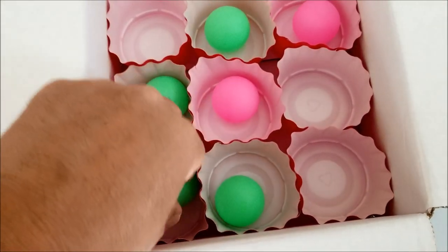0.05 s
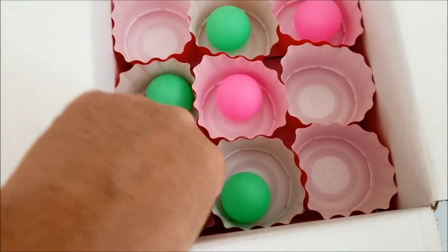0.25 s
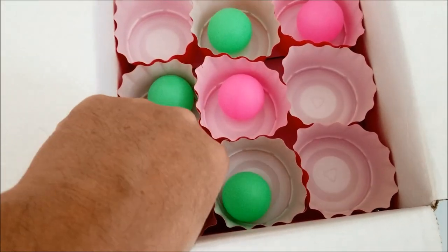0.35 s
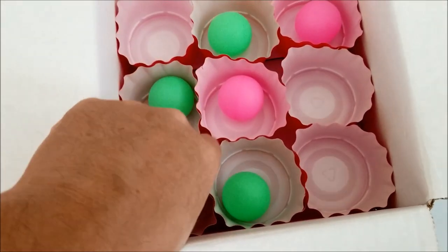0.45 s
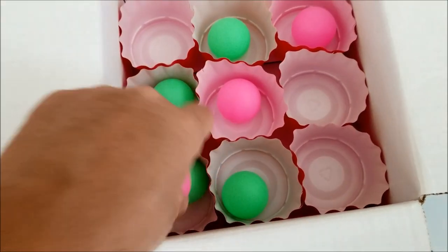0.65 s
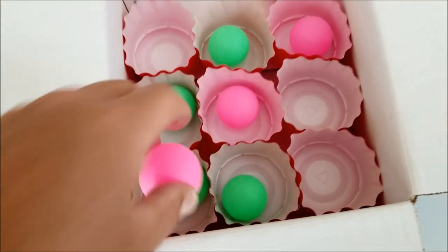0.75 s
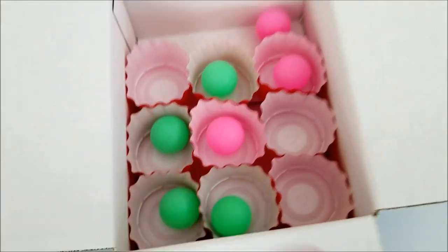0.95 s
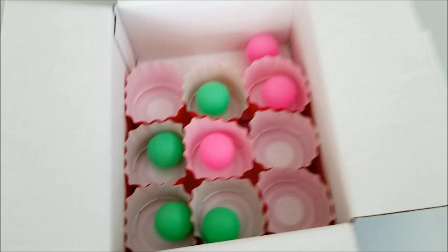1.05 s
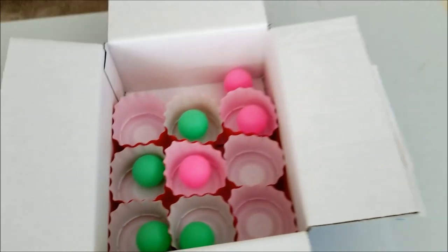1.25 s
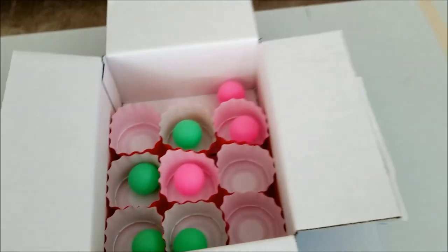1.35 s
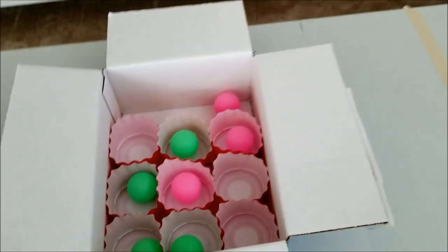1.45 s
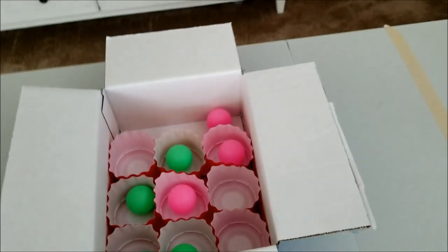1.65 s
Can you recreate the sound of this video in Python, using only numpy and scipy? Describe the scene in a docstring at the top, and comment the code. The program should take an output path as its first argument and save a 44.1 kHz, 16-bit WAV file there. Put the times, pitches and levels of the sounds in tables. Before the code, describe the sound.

One sharp knock of a plastic ball dropped among paper cups, with two tiny bounces.

```python
"""A few soft touches and a tick, then one sharp knock that rings round a bare room, and two small bounces:
a light plastic ball is handled among paper cups in a cardboard box. Each hit is a hard plastic crack,
the ringing modes of ball and box, and a swarm of echoes off cups, box and walls. Fingers rustle the
paper and the box thuds in the hand. Something soft swishes twice near the end; a low rumble and a thin
hiss lie beneath."""
import sys
import numpy as np
from scipy import signal
from scipy.fft import rfft, irfft, next_fast_len
from scipy.io import wavfile

SR = 44100
rng = np.random.default_rng(int(sys.argv[2]) if len(sys.argv) > 2 else 0)


def generate_wav(sig):
    """Save sig (samples, or channels by samples) to the path in sys.argv[1] as 16-bit PCM at SR."""
    pcm = np.round(np.clip(np.atleast_2d(sig).T, -1, 1) * 32767).astype(np.int16)
    wavfile.write(sys.argv[1], SR, pcm)


N = 74970

# Fader of the hiss: time_s, level_db
HISS_FADER = [(0, -72), (.03, -80), (.09, -65), (.16, -74), (.6, -78.5), (.7, -82.5), (1.15, -80.5),
              (1.24, -77.5), (1.4, -76.5), (1.7, -77.5)]
# Tone of the hiss: pitch_hz, gain_db
HISS_COLOUR = [(400, -28), (600, -19), (1000, -15.5), (2500, -17), (6600, -20), (10000, -11.5), (13800, -2),
               (16000, -3.5)]
# Fader of the rumble: time_s, level_db
RUMBLE_FADER = [(0, -55), (.036, -64), (.098, -58), (.208, -62), (.254, -55), (.344, -62), (.45, -63),
                (.55, -67), (.9, -69), (1.3, -68), (1.7, -66.5)]
# Tone of the rumble: pitch_hz, gain_db
RUMBLE_COLOUR = [(20, -11), (45, -16), (80, -2.5), (125, -9), (165, -5.5), (200, -13), (290, -14),
                 (330, -24.5), (420, -36.5)]
# Resonant humps in the rumble: pitch_hz, width_hz, gain_db
RUMBLE_HUMPS = [(78, 14, 3), (158, 18, 3), (287, 18, -9)]
# Stereo image of hiss and rumble: pitch_hz, left_right_correlation
BED_IMAGE = [(60, 1), (180, 1), (550, 1), (1650, -0.56), (4970, -0.06), (15000, -0.19)]
# Deep bumps of the handled box: time_s, gain_db
BUMP_FADER = [(0.0, -69), (0.066, -53.5), (0.082, -53), (0.106, -58), (0.12, -56), (0.14, -68.5),
              (0.176, -56.5), (0.214, -74.5), (0.244, -51), (0.274, -63), (0.296, -59.5), (0.392, -75.5),
              (0.444, -67), (0.5, -82.5)]
# The two swishes: time_s, gain_db, left_over_right_db, tilt_db_per_octave
SWISH_MOVES = [(1.22, -100, 0.5, -0.18), (1.3, -81.5, 0, 0.3), (1.36, -70, .6, -1), (1.41, -69, 1.3, -0.7),
               (1.45, -70.5, 3.5, -1), (1.49, -77.5, 2, -0.5), (1.53, -75.5, 0, 0), (1.575, -71, 0, 0.5),
               (1.61, -72, 2.5, 0.6), (1.66, -80.5, -0.5, 0.4), (1.7, -92.5, 2.5, 1.1)]
# Tone of the swishes: pitch_hz, gain_db
SWISH_COLOUR = [(240, -39), (400, -9), (429, -13.5), (623, -6.5), (811, -7.5), (1160, -7), (1840, -0.5),
                (5130, -14), (11000, -21), (14300, -47.5), (22000, -120)]
# Paper under the hand: time_s, gain_db, tilt_db_per_octave
RUSTLE_MOVES = [(.05, -78, 0.9), (.075, -71, -0.8), (.096, -48.5, -0.6), (.115, -55.5, -4), (.156, -57, -2),
                (.19, -58.5, 1.3), (.23, -59.5, .1), (.38, -62, -1.17), (.41, -55, 0.56), (.44, -61, 0.5),
                (.486, -57, 0), (.51, -61, -1.07), (.58, -64, .5), (.62, -74.5, 0), (.67, -90.5, 2.24)]
# Tone of the paper: pitch_hz, gain_db
PAPER_COLOUR = [(300, -6.5), (520, 0), (850, -5.5), (1300, -13.5), (2200, -9.5), (3500, -18.5), (8000, -22),
                (13000, -24), (16000, -27.5)]
# Stereo image of swishes, paper and echoes: pitch_hz, left_right_correlation
ACTION_IMAGE = [(60, 0.94), (240, 0.72), (950, 0.71), (3770, -0.19), (15000, 0.21)]
# Tone of a knock as the room returns it: pitch_hz, gain_db
ECHO_COLOUR = [(200, -29.5), (300, -8.5), (1000, -5.5), (2100, -1), (5200, -3), (9000, -4), (13500, -7.5),
               (16000, -14)]
# First fast decay of the echoes: pitch_hz, t60_s
EARLY_DECAY = [(250, 0.27), (700, .2), (2000, 0.073), (6000, 0.091), (14000, 0.061)]
# Room tail: pitch_hz, t60_s
TAIL_DECAY = [(250, 0.29), (700, 0.53), (2000, .4), (6000, .32), (14000, 0.2)]
# Slaps of the crack off the nearest walls: delay_s, gain_db
WALL_SLAPS = [(.0018, -3.5), (.0042, -7), (.012, -6.5), (.031, -16.5)]
# Modes of ball and box: pitch_hz, gain_db, t60_s
BODY_MODES = [(315, -3, .1), (428, -3, .1), (512, -1.5, .16), (604, -7, .1), (790, -5, .1),
              (829, -1.5, .16), (905, -7, .2), (1099, -1.5, .08), (1340, -2.5, .09), (1600, -5, .07),
              (1745, -5, .07), (1995, -5, .08), (2448, -1.5, .05), (2925, -8, .07), (3352, -7, .16),
              (5620, -5, .05)]
# Hits of the ball, each with a send to ring and echoes: start_s, gain_db, tilt_db_per_octave, send_db
KNOCKS = [(0.0749, -60, 10.5, -7.7), (0.0888, -48, 1.25, -8.3), (.136, -51, -6.5, -0.5),
          (.199, -33, 2.5, -12.5), (0.2345, -12.5, 0.05, 2.44), (.400, -48, -4, 3.6), (0.479, -54, -1, 4.5),
          (.595, -61.5, 0, 1.1)]

HISS_PAN_DB, LOW_PAN_DB, PAPER_PAN_DB, KNOCK_PAN_DB = 2.5, 3.5, 2.5, 2
WHINE_HZ, WHINE_DB = 14200, -101
ECHO_DB, TAIL_DB, ECHOES_PER_S, ECHO_SPREAD_DB = -6, -14, 8200, 3.5
BUILD_S, BUILD_CYCLES = 0.00058, 3.0   # attack of the echo swarm, lows later
BODY_DB, SWELL_CYCLES, EAR_PHASE_RAD = -17.5, 3.0, 0.55
CRACK_DECAY_S, CRACK_DB, CRACK_LOW_CUT_HZ, KNOCK_LOW_CUT_HZ = 0.00052, 7, 1190, 260
SHELL_BAND_HZ, SHELL_DB = (1300, 3325), 1   # the ball's shell lifts this band of the crack
TOP_STOP_HZ = 16800


def amp(db):
    return 10 ** (np.asarray(db) / 20)


def unit_rms(x):
    return x / np.sqrt(np.mean(x ** 2) + 1e-20)


def butter(x, order, hz, kind):
    return signal.sosfilt(signal.butter(order, hz, kind, fs=SR, output="sos"), x)


def automation(rows):
    """One curve per column, gliding between the timed rows."""
    times_s, *columns = np.transpose(rows)
    return [np.interp(np.arange(N) / SR, times_s, column) for column in columns]


def at_hz(points, hz):
    """Read a curve along a log pitch axis."""
    pitches_hz, values = np.transpose(points)
    return np.interp(np.log(hz), np.log(pitches_hz), values)


def drift(rate_hz):
    """Slow random wobble of rms 1."""
    hop, settle = 40, 2000
    pole = np.exp(-2 * np.pi * rate_hz * hop / SR)
    white = rng.standard_normal(N // hop + settle + 2)
    slow = signal.lfilter([1], [1, -2 * pole, pole * pole], white)[settle:]
    return np.interp(np.arange(N) / hop, np.arange(len(slow)), unit_rms(slow))


def pan(db):
    """Stereo gains that put left db above right."""
    return amp(np.array([db / 2, -db / 2]).reshape(2, -1))


def bands(white, low_hz, image):
    """Third-octave stereo bands; two mid-side noises alternate so that neighbours are unrelated."""
    edges = low_hz * 2 ** np.arange(0, np.log2(17000 / low_hz), 1 / 3)
    for k, (low, high) in enumerate(zip(edges, edges[1:])):
        mid, side = butter(white[k % 2], 2, [low, high], "band")
        hz = np.sqrt(low * high)
        alike = np.clip(at_hz(image, hz), -1, 1)
        yield hz, np.sqrt(1 + alike) * mid + np.sqrt(1 - alike) * side * [[1], [-1]]


def coloured_noise(colour, image, low_hz, flicker_db, tilt=0):
    """Stereo noise of rms 1 whose bands flicker a little, together and apart."""
    shared_drift = drift(10)
    white = rng.standard_normal((2, 2, N))
    out = 0
    for hz, band in bands(white, low_hz, image):
        flicker = flicker_db * (shared_drift + drift(5.9))
        out = out + amp(at_hz(colour, hz) + flicker + tilt * np.log2(hz / 700)) * band
    return unit_rms(out)


def resonant_noise(pitch_hz, width_hz):
    """White noise through one resonance."""
    radius, angle = np.exp(-np.pi * width_hz / SR), 2 * np.pi * pitch_hz / SR
    poles = [1, -2 * radius * np.cos(angle), radius ** 2]
    return signal.lfilter([1, 0, -1], poles, rng.standard_normal(N))


def hiss():
    """Thin hiss, strongest at the top, with a faint wavering whine."""
    level_db, = automation(HISS_FADER)
    phase = 2 * np.pi * WHINE_HZ * np.arange(N) / SR + 1.5 * drift(20)
    whine = np.sqrt(2) * amp(WHINE_DB) * np.sin(phase)
    air = coloured_noise(HISS_COLOUR, BED_IMAGE, low_hz=400, flicker_db=0.5)
    return pan(HISS_PAN_DB) * (amp(level_db) * air + whine)


def rumble():
    """A low bed with three resonant humps, swelling while the box is handled."""
    level_db, = automation(RUMBLE_FADER)
    low = coloured_noise(RUMBLE_COLOUR, BED_IMAGE, low_hz=20, flicker_db=0.8)
    for hz, width_hz, hump_db in RUMBLE_HUMPS:
        low = low + amp(hump_db - 8) * unit_rms(resonant_noise(hz, width_hz))
    return amp(level_db) * pan(LOW_PAN_DB) * unit_rms(butter(low, 5, 340, "low"))


def box_bumps():
    """Deep, slow thuds carried through the box and the hand."""
    gain_db, = automation(BUMP_FADER + [(0.6, -100)])   # faded out by 0.6 s
    thud = butter(resonant_noise(pitch_hz=62, width_hz=30), 4, 110, "low")
    return amp(gain_db - 0.5) * pan(LOW_PAN_DB) * unit_rms(thud)


def swishes():
    """Two soft strokes of smooth noise, leaning left."""
    gain_db, pan_db, tilt = automation(SWISH_MOVES)
    stroke = coloured_noise(SWISH_COLOUR, ACTION_IMAGE, low_hz=400, flicker_db=0.5, tilt=tilt)
    return amp(gain_db + 2.5) * pan(pan_db) * stroke


def paper_rustle():
    """Fingers brush the paper cups: noise that shifts in level and brightness."""
    gain_db, tilt = automation(RUSTLE_MOVES)
    paper = coloured_noise(PAPER_COLOUR, ACTION_IMAGE, low_hz=300, flicker_db=0.42, tilt=tilt)
    return amp(gain_db) * pan(PAPER_PAN_DB) * paper


def strikes(hz, send=False):
    """One click per knock, as strong as it is at this pitch; send adds its send gain."""
    start_s, gain_db, tilt, send_db = np.transpose(KNOCKS)
    clicks = np.full(N, 1e-18)
    clicks[(start_s * SR).astype(int)] = amp(gain_db + tilt * np.log2(hz / 2000) + send * send_db)
    return clicks


def echo_swarm():
    """Cups, box and walls return each knock as a swarm of echoes that dies in two stages, band by band."""
    t = np.arange(SR // 2) / SR
    shape, fft_size = (2, 2, len(t)), next_fast_len(N + len(t))
    strength = amp(ECHO_SPREAD_DB * np.minimum(rng.exponential(1, shape), 2))
    polarity = rng.choice([-1, 1], shape)
    arrives = rng.random(shape) < ECHOES_PER_S * (1 + t / 0.01) / SR   # thickens from its starting rate
    spectrum = 0
    for hz, band in bands(unit_rms(strength * polarity * arrives), 180, ACTION_IMAGE):
        attack = 1 - np.exp(-t / (BUILD_S + BUILD_CYCLES / hz))
        early = amp(-60 * t / at_hz(EARLY_DECAY, hz))
        tail = amp(TAIL_DB - 60 * t / at_hz(TAIL_DECAY, hz))
        response = amp(at_hz(ECHO_COLOUR, hz)) * band * attack * (early + tail)
        spectrum = spectrum + rfft(response, fft_size) * rfft(strikes(hz, send=True), fft_size)
    return amp(ECHO_DB) * irfft(spectrum, fft_size)[:, :N]


def body_ring():
    """After each knock the modes of ball and box swell in and ring, with a different phase at each ear."""
    t = np.arange(SR // 3) / SR
    spectrum, fft_size = 0, next_fast_len(N + len(t))
    for hz, gain_db, t60_s in BODY_MODES:
        phase = rng.uniform(0, 2 * np.pi) + rng.choice([-1, 1]) * EAR_PHASE_RAD * np.array([[1], [-1]])
        swell = 1 - np.exp(-t * hz / SWELL_CYCLES)
        ring = np.sin(2 * np.pi * hz * t + phase) * swell * amp(gain_db - 60 * t / t60_s)
        spectrum = spectrum + rfft(ring, fft_size) * rfft(strikes(hz, send=True), fft_size)
    return amp(BODY_DB) * irfft(spectrum, fft_size)[:, :N]


def snap(clicks):
    """Turn each click into a tiny dying noise burst, slightly different at each ear."""
    t = np.arange(SR // 30) / SR
    burst = rng.standard_normal(len(t)) + 0.27 * rng.standard_normal((2, len(t)))
    burst *= np.exp(-t / CRACK_DECAY_S)
    burst /= np.linalg.norm(burst, axis=1, keepdims=True)
    return signal.fftconvolve(clicks[None], burst, axes=1)[:, :N]


def ball_crack():
    """The hard plastic tick of each knock and its slaps off the nearest walls, coloured by the shell."""
    crack = snap(strikes(hz=3000))
    for delay_s, gain_db in WALL_SLAPS:
        delayed = np.roll(strikes(hz=3000, send=True), int(delay_s * SR))
        crack = crack + amp(gain_db) * snap(delayed)
    shell = amp(SHELL_DB) * butter(crack, 2, SHELL_BAND_HZ, "band")
    return amp(CRACK_DB) * butter(crack + shell, 2, CRACK_LOW_CUT_HZ, "high")


def scene():
    """The knocks up front, over the handling noises and the bed."""
    knocks = butter(ball_crack() + body_ring() + echo_swarm(), 6, KNOCK_LOW_CUT_HZ, "high")
    return pan(KNOCK_PAN_DB) * knocks + paper_rustle() + swishes() + rumble() + box_bumps() + hiss()


def record(dry):
    """A steep high cut takes off the very top."""
    return signal.sosfilt(signal.cheby2(14, 60, TOP_STOP_HZ, fs=SR, output="sos"), dry)


dry = scene()
out = record(dry)
generate_wav(out)
```